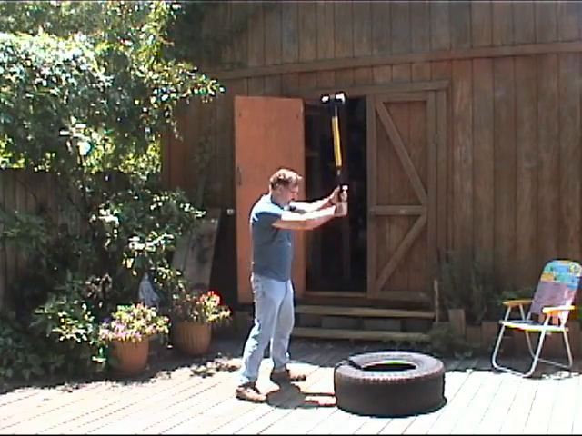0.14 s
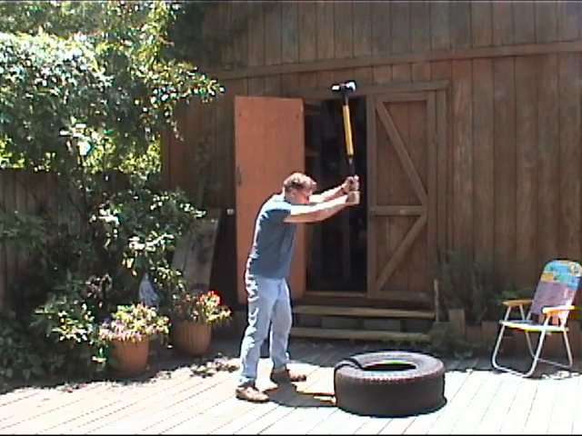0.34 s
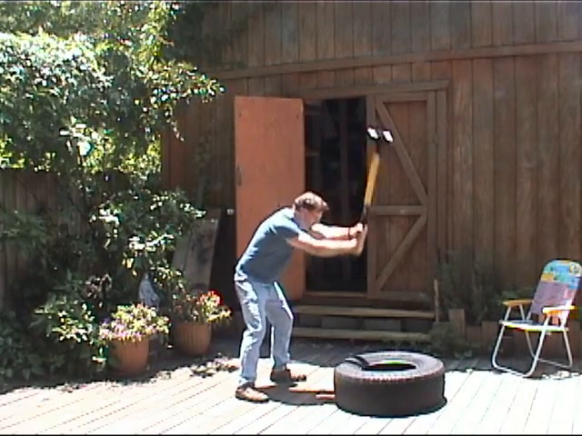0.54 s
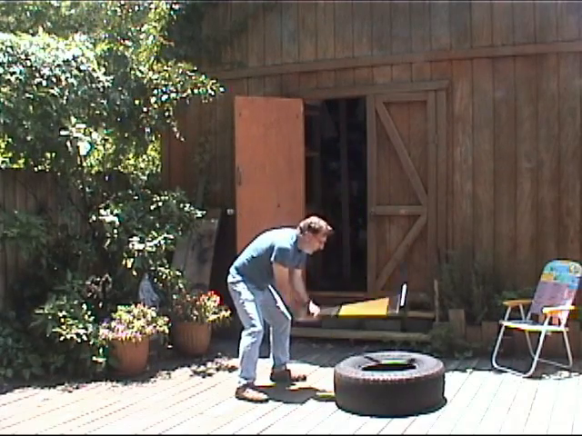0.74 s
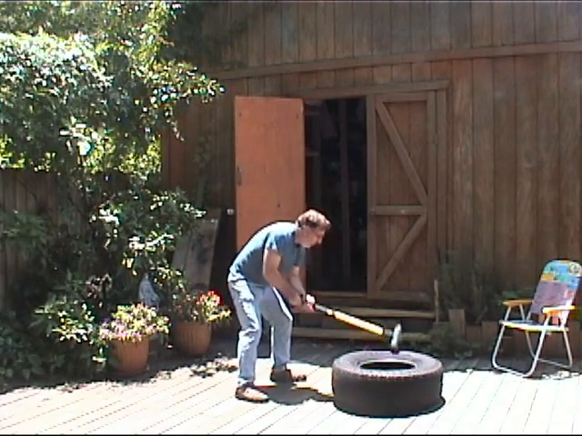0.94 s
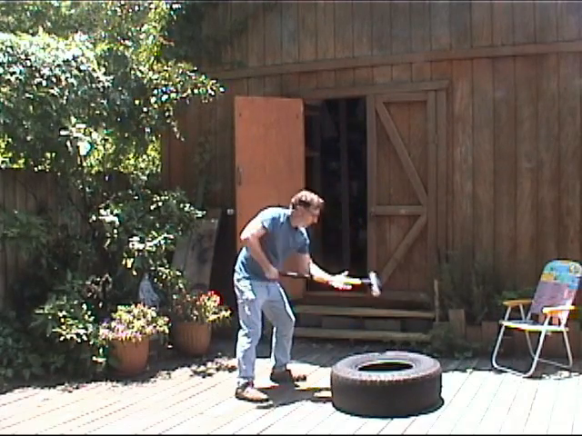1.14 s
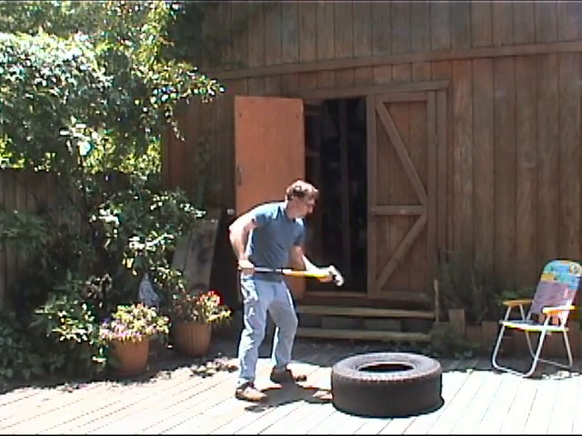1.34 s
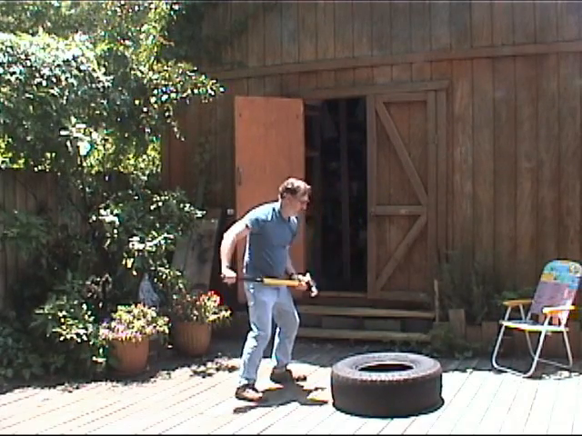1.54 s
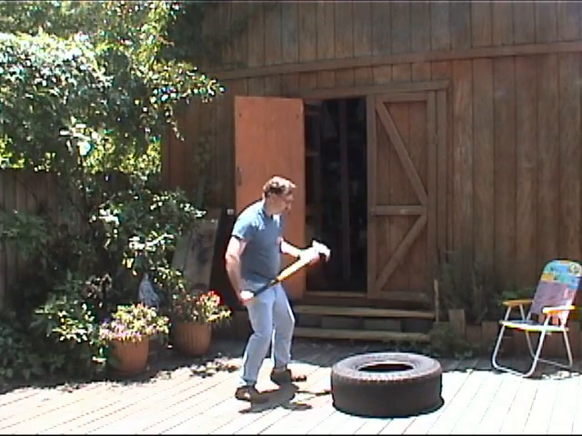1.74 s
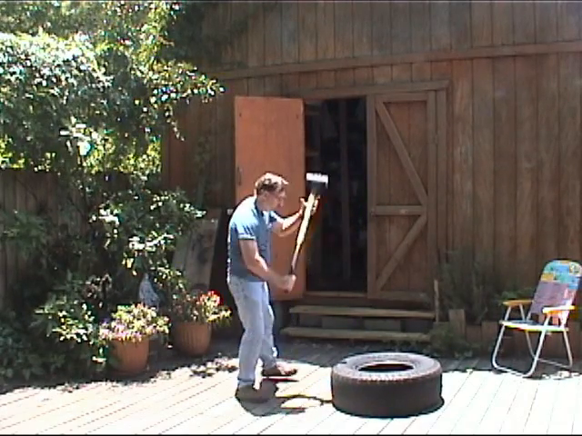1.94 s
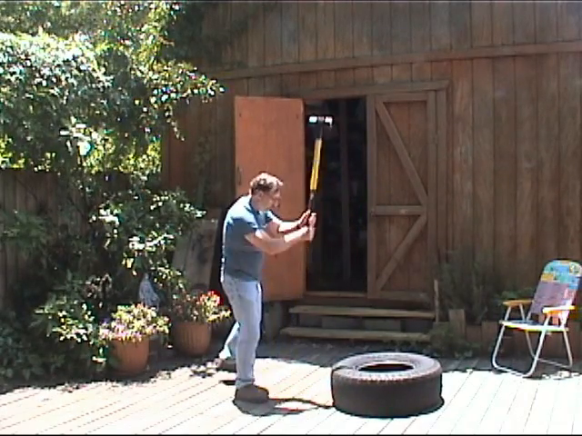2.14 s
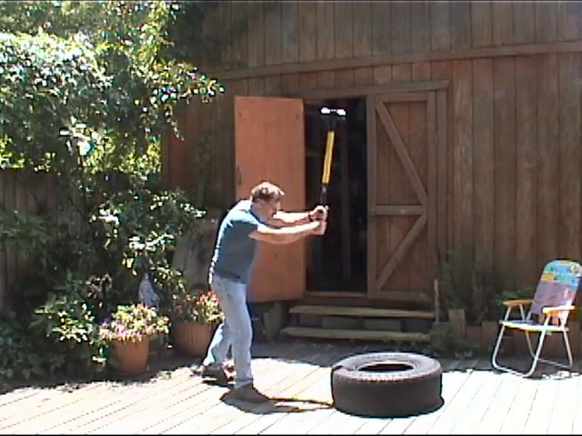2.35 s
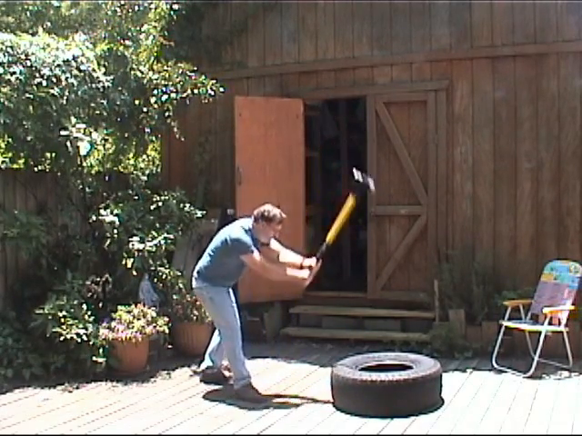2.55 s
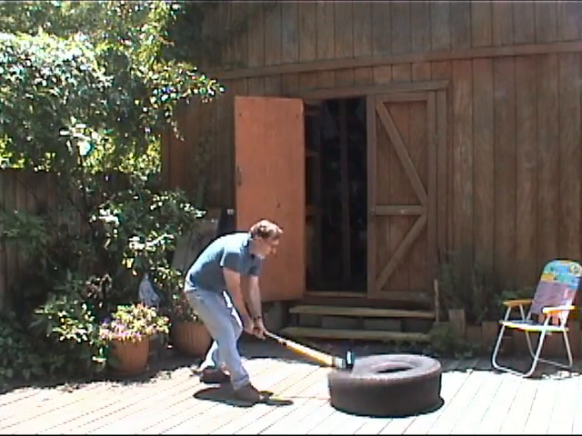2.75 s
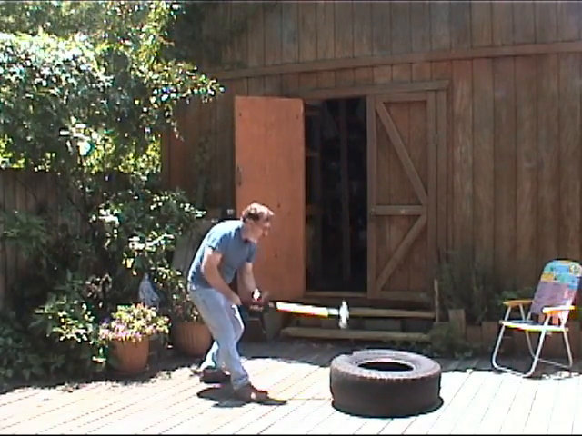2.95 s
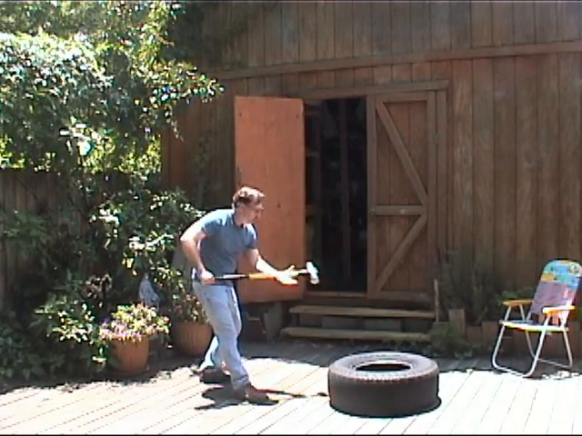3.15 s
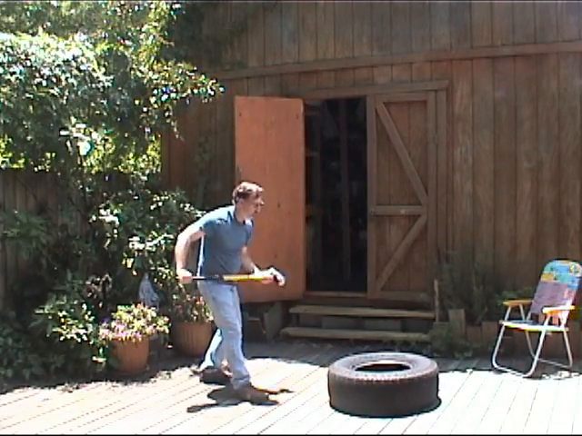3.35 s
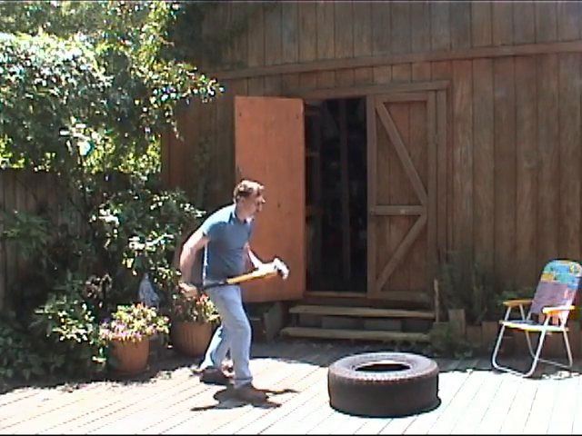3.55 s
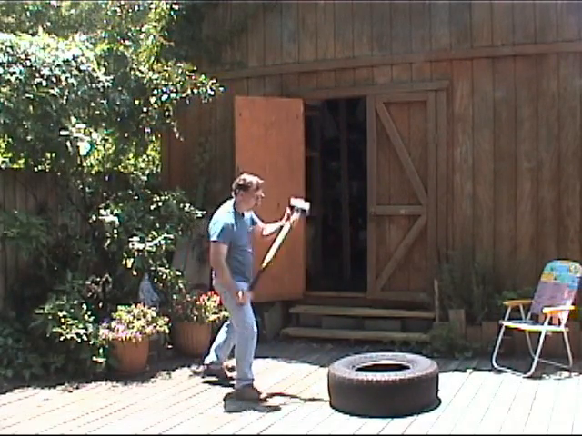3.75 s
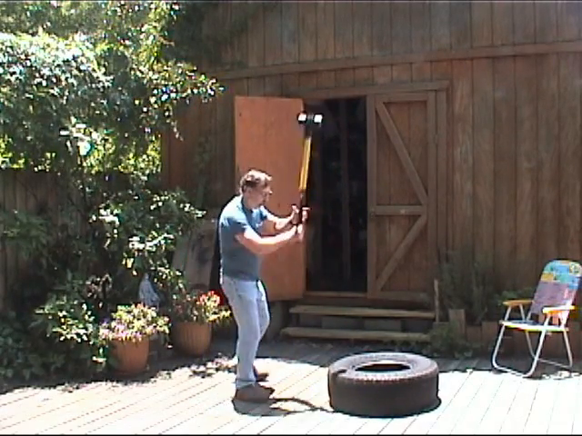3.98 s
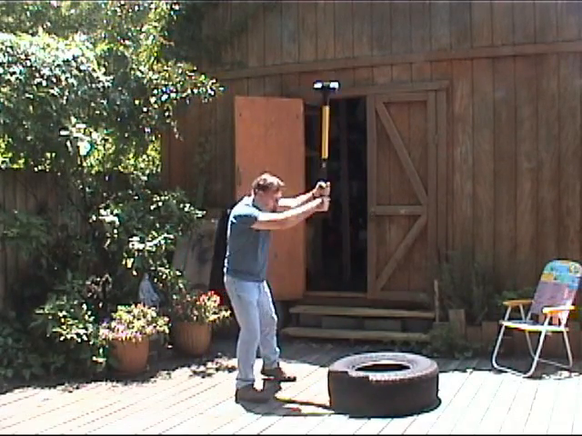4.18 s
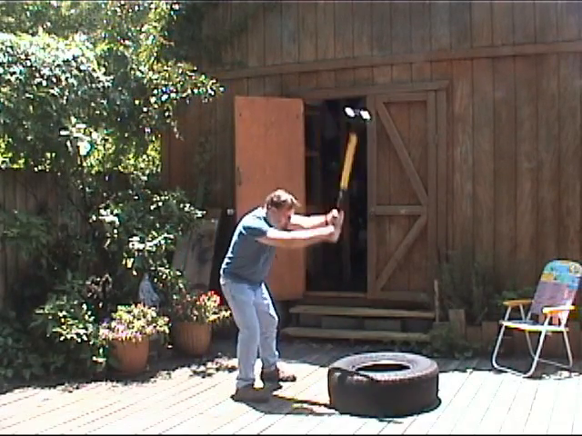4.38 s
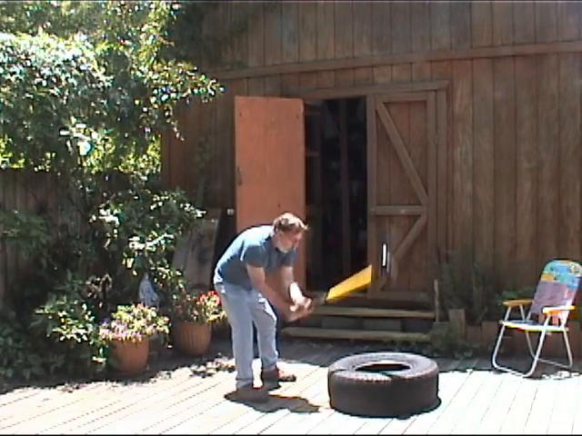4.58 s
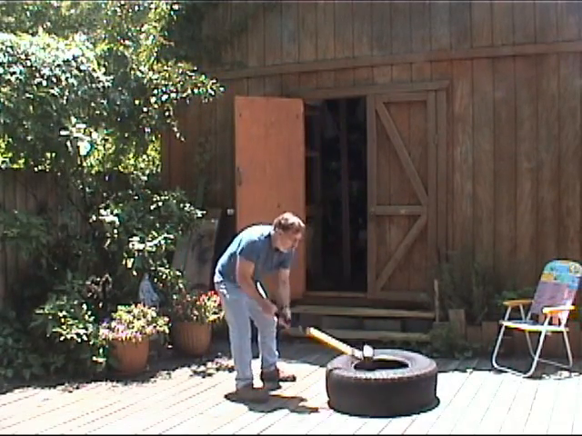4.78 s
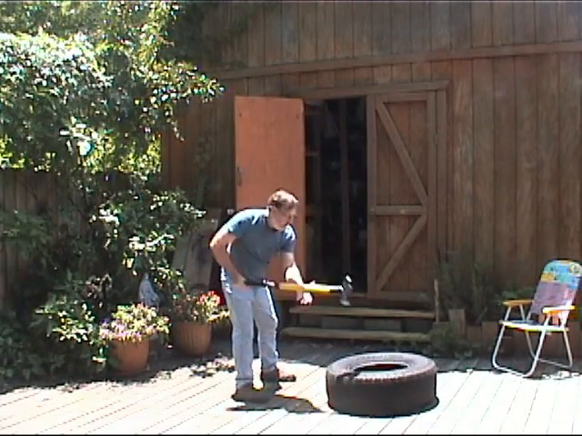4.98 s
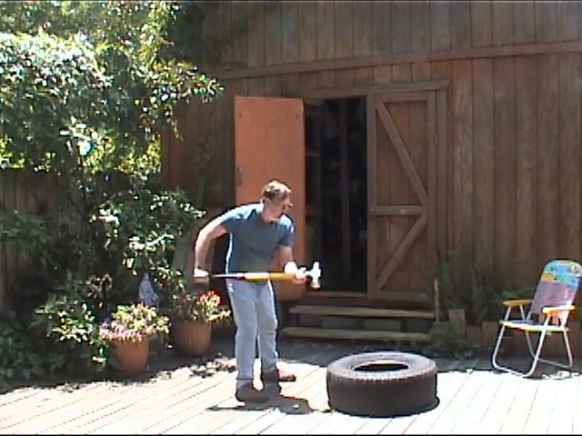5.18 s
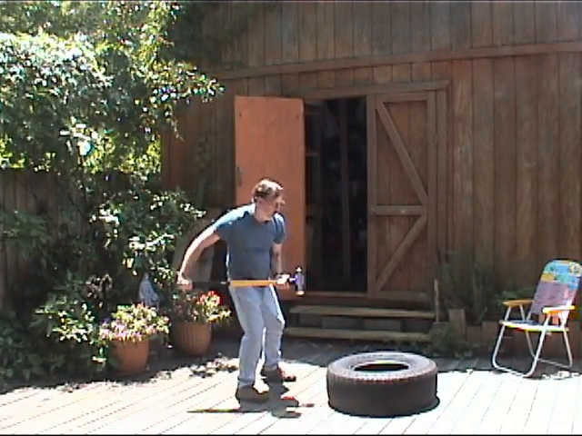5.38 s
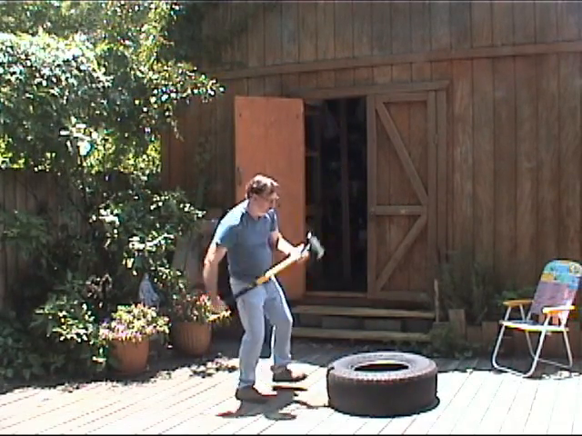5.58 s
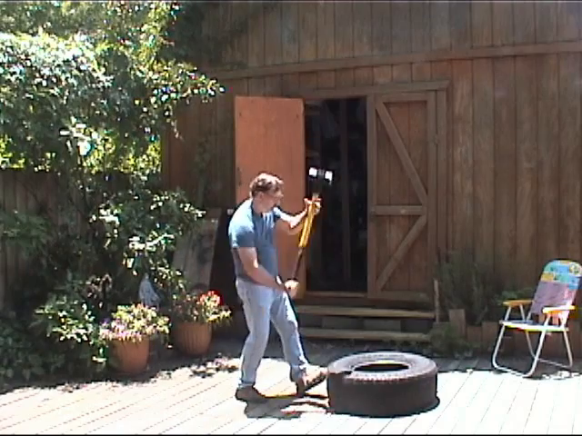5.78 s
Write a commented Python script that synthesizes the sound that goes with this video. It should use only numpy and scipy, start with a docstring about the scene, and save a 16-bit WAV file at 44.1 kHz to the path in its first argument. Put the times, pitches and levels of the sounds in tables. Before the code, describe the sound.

In a yard beside a wooden shed, a steady soft hush carries a faint low hum and thin motor whine. A hand brushes briefly along a shaft at the start, and shoes tap lightly. At 0.9 s a sledgehammer slaps a big rubber tyre against planks: a loud, blunt, woody thud with a short hollow hum of trapped air, then softer tumbling knocks until about 1.2 s. A very faint rising bird whistle comes at 1.4 s. Another faint slide and several shoe scuffs lead to the second blow at 2.8 s, brighter and grittier, with quick clacks just after and a smaller one at 3.1 s. A second tiny whistle follows near 3.4 s, then footfalls around 4.1 s. The third blow lands at 4.75 s, deeper and boomy, and the tyre knocks back down at 5.0 s. Short echoes fade and the quiet hush remains to about 6 s.

```python
"""The yard of a wooden shed: a sledgehammer pounds a big rubber tyre lying on a plank deck. Each blow slaps the
rubber and knocks the planks; the tyre shudders, its trapped air hums, and it jumps and lands again. A hand slides
on the shaft, shoes tap, a bird whistles far off, over a hush, a mains hum and a thin motor whine. Ringing is made
of decaying sines or filtered noise, hisses of shaped noise, whistle and hums of wavering sines."""
import sys
import numpy as np
from scipy import signal
from scipy.fft import rfft, irfft, next_fast_len
from scipy.io import wavfile
from scipy.ndimage import map_coordinates

SR = 44100
rng = np.random.default_rng(int(sys.argv[2]) if len(sys.argv) > 2 else 0)


def dump(signal):
    """Clip the signal to [-1, 1] and save it as 16-bit WAV at the path in sys.argv[1]."""
    limited = np.clip(np.atleast_2d(signal).T, -1, 1)
    pcm = np.round(limited * 32767).astype(np.int16)
    wavfile.write(sys.argv[1], SR, pcm)


N = 256662  # length in samples
# In all tables, t60_s is the time a sound takes to fall by 60 dB.


def amp(db):
    """Turn decibels into a plain multiplier."""
    return 10 ** (np.asarray(db) / 20)


def unit(x):
    """Scale a sound to an rms (average strength) of 1."""
    return x / np.sqrt(np.mean(x ** 2) + 1e-20)


def along(points, hz):
    """Read a curve of (pitch_hz, value) points, spaced by pitch ratio as the ear hears it."""
    point_hz, value = np.transpose(points)
    return np.interp(np.log(hz + 1), np.log(point_hz + 1), value)


def wobble(rate):
    """A smooth random curve through this many random points a second."""
    points = rng.standard_normal(int(N * rate / SR) + 4)
    return map_coordinates(points, [np.arange(N) * rate / SR])


def filtered(x, response):
    """Change the strength and phase of each frequency in x."""
    size = next_fast_len(N + SR // 2)
    hz = np.fft.rfftfreq(size, 1 / SR)
    return irfft(rfft(x, size) * response(hz), size)[..., :N]


def resonant(modes, widen):
    """A filter that rings at each mode; widen multiplies the damping, so shortens the ringing."""
    def response(f):
        total = 0
        for k, (hz, db, t60) in enumerate(modes):
            width = widen * np.log(1000) / (np.pi * t60)
            total = total + (-1) ** k * amp(db) * 1j * f * width / (hz * hz - f * f + 1j * f * width)
        return total
    return response


def pair(alike, colour):
    """Stereo noise of rms 1, with a left-right likeness and a gain for each frequency."""
    def mid_and_side(hz):
        turn = np.arccos(np.clip(along(alike, hz), -1, 1)) / 2
        return colour(hz) * np.array([np.cos(turn), np.sin(turn)])
    mid, side = filtered(rng.standard_normal((2, N)), mid_and_side)
    return unit(np.array([mid + side, mid - side]))


def leaning(x, lean):
    """Make left and right differ in level, by frequency."""
    return filtered(x, lambda hz: amp(np.outer([.5, -.5], along(lean, hz))))


# colour of the yard's hush: pitch_hz, level_db (per Hz)
HUSH_COLOUR = [(7.1, -66), (12, -21), (54, 2.5), (90, -6), (102, -20), (122, -8.5), (142, -5.5), (236, -6),
               (259, -8.5), (301, -8), (394, -10), (601, -9.5), (2550, -16.5), (13000, -32.5), (16000, -65)]
# how alike left and right are in the hush: pitch_hz, likeness (1 = same, 0 = unrelated, below 0 = opposed)
HUSH_ALIKE = [(60, 0.3), (130, 0.92), (290, 0.8), (640, 0.76), (1410, 0.64), (3100, 0.27), (6820, -0.017),
              (15000, -0.75)]
# steady hum and motor tones: pitch_hz, level_db (before a shared lift), waver_hz
STEADY_TONES = [(118, -54, 2.55), (1285, -64, 2.7), (1653, -60.5, 2.04), (8800, -76.5, 13.2),
                (13334, -73.5, 20)]
# narrow band of motor noise: pitch_hz, level_db, t60_s (before widening)
MOTOR_BAND = [(2632, 0, 0.019)]
# balance of the yard: pitch_hz, left_minus_right_db
YARD_BALANCE = [(60, -5), (240, -4.0), (950, -0.5), (3770, -1.5), (15000, -1.5)]
HUSH_DB = -43.5


def yard():
    """Steady hush of shaped noise, with hum and motor tones that waver a little in pitch and level."""
    hush_level = amp(HUSH_DB + 0.48 * wobble(2.89) + 0.2 * wobble(33))
    hush = hush_level * pair(HUSH_ALIKE, lambda hz: amp(along(HUSH_COLOUR, hz)))
    tones = np.zeros(N)
    for hz, level, waver_hz in STEADY_TONES:
        tone_level = amp(level + 3.5 + 1.4 * wobble(8.1))
        cycles = np.cumsum(hz + waver_hz * wobble(15)) / SR
        tones += tone_level * np.sin(2 * np.pi * cycles)
    whirr = amp(-60.5 + 2.4 * wobble(5.4)) * pair([(2690, 0.99)], resonant(MOTOR_BAND, widen=1.05))
    return leaning(hush + tones + whirr, YARD_BALANCE)


# a hand sliding along the shaft: peak_s, level_db
HAND_SLIDES = [(0.065, -44), (2.185, -44.5)]
# colour of palm on shaft: pitch_hz, level_db (per Hz)
PALM_COLOUR = [(1470, -36), (2500, -26), (2780, -2), (4140, -6), (4500, -5), (10600, -6), (15500, -8)]
SLIDE_RISE_DB_PER_S, SLIDE_FALL_DB_PER_S = 450, 222


def slide():
    """Skin rubs along the shaft as the hammer is raised: shaped noise that swells and fades."""
    t = np.arange(N) / SR
    gain = np.zeros(N)
    for peak_s, db in HAND_SLIDES:
        drop_db = np.maximum(SLIDE_RISE_DB_PER_S * (peak_s - t), SLIDE_FALL_DB_PER_S * (t - peak_s))
        gain += amp(db - drop_db)
    return gain * amp(1.1 * wobble(86)) * pair([(5000, 0.69)], lambda hz: amp(along(PALM_COLOUR, hz)))


# colour of the rubber slap: pitch_hz, level_db (per Hz)
SLAP_HISS = [(1200, 7), (2600, -1), (4000, 1.5), (6000, -1.5), (8500, -10)]
# colour of grit thrown up: pitch_hz, level_db (per Hz)
GRIT_FIZZ = [(5000, 17), (7500, 5.5), (11000, 5), (14000, -10), (16000, -30.5)]


def bright(spectrum):
    """Treble noise, largely different left and right, with a second of silence added at the end."""
    noise = pair([(3000, 0.23), (8000, 0.18), (12000, 0.28)], lambda hz: amp(along(spectrum, hz)))
    return np.pad(noise, ((0, 0), (0, SR)))


# shoes and grit on the planks: start_s, level_db, fizz_db (relative to the tap), pitch_hz, spread_octaves
SHOE_TAPS = [(0.444, -43, -21, 3000, 1.1), (.845, -36, -17, 1000, 0.97), (1.808, -48, -12, 4200, 0.29),
             (2.355, -33.5, -7, 980, 1.8), (2.363, -38, -12, 1200, 0.56), (2.447, -29.5, -22, 1030, 1.5),
             (2.456, -37, -24, 880, 1.2), (2.602, -44.5, -0.5, 5060, 1.1), (2.683, -51, 6, 4000, .9),
             (2.692, -50, 9, 4000, .9), (2.793, -52, 10, 4000, 0.87), (3.309, -45, -2, 5020, 1.1),
             (3.715, -49, 4, 3500, .9), (3.851, -45, -2, 3480, 0.57), (4.1057, -30.5, -3, 3250, 0.26),
             (4.219, -29.5, -14, 940, 1.3)]
TAP_CYCLES, TAP_T60_S = 30, .025  # a puff's t60 is this fixed part plus so many cycles of its pitch
TAP_FIZZ_T60_S = .02


def taps():
    """Shoes scuff lightly: a puff of noise around one pitch and a gritty fizz."""
    out, t, fizz = np.zeros((2, N + SR)), np.arange(SR // 5) / SR, bright(GRIT_FIZZ)
    grid_hz = np.fft.rfftfreq(len(t), 1 / SR) + 1
    onset = 1 - np.exp(-t / .001)
    for s, db, fizz_db, hz, octaves in SHOE_TAPS:
        first = round(s * SR)
        at = slice(first, first + len(t))
        colour = amp(-10 * (np.log2(grid_hz / hz) / octaves) ** 2)
        puff = unit(irfft(rfft(rng.standard_normal(len(t))) * colour, len(t)))
        fading_puff = onset * amp(-60 * t / (TAP_T60_S + TAP_CYCLES / hz)) * puff
        fading_fizz = amp(fizz_db - 60 * t / TAP_FIZZ_T60_S) * fizz[:, at]
        out[:, at] += amp(db) * (fading_puff + fading_fizz)
    return out[:, :N]


def ring(modes, t, centre_hz, octaves):
    """One contact: modes near its brightest pitch ring most, each at a new random strength; peak 1."""
    hz, db, t60 = np.transpose(modes)[:, :, None]
    near_db = -15 * np.log10(1 + (np.log2(hz / centre_hz) / octaves) ** 2)  # a peak with wide skirts
    scatter_db = 3 * rng.standard_normal(hz.shape)
    strength = amp(db + near_db + scatter_db - 60 * t / t60)
    x = np.sum(strength * np.sin(2 * np.pi * hz * t), axis=0)
    return x / np.abs(x).max()


# the tyre's walls: pitch_hz, level_db, t60_s (before any widening)
TYRE_WALLS = [(96.5, -4.5, 0.11), (114, -1, 0.093), (160.3, -3, 0.084), (183.3, -4, 0.16),
              (249.4, -6, 0.12), (298.7, -5.5, 0.099), (331, -8.5, 0.088)]
# the plank deck: pitch_hz, level_db, t60_s (before any added damping)
DECK_PLANKS = [(440.7, -5, 0.046), (530.5, 0.5, 0.074), (579, -1.5, 0.073), (657.5, -3, 0.17),
               (706, -0.5, 0.048), (815, -2, 0.034), (871.4, 1.5, 0.054), (962, 0.5, 0.056),
               (1026, -1, 0.061), (1150, -8, 0.024), (1250, -2, 0.086), (1496, -6.5, 0.035),
               (1680, -7, 0.031), (1947, -12, 0.022), (2350, -11.5, 0.034), (2810, -21.5, 0.0065),
               (3720, -27, 0.025), (4170, -29, 0.059)]
CONTACT_DELAY_S = .001  # every contact starts this long after its listed time


def contacts(table, octaves, t60_ms):
    """Each contact knocks the planks, thumps the tyre's walls and slaps the rubber."""
    out, t = np.zeros((2, N + SR)), np.arange(SR // 4) / SR
    hiss, fizz = bright(SLAP_HISS), bright(GRIT_FIZZ)
    # rubber pressed on the planks damps them
    press = amp(-60 * 1000 * t / max(t60_ms, 5))
    for s, db, hz, crack_db, fizz_db, thud_db, thud_hz, rise_ms in table:
        first = round((s + CONTACT_DELAY_S) * SR)
        at = slice(first, first + len(t))
        # a rolling landing swells, a flat slap starts sharply
        shape = (1 - np.exp(-1000 * t / max(rise_ms, .05))) ** 2 * press
        knock = ring(DECK_PLANKS, t, hz, octaves) * shape / shape.max()
        thud = amp(thud_db - 5.5) * ring(TYRE_WALLS, t, thud_hz, octaves=0.22)
        crack = amp(-9.5 - 60 * t / 0.013) * (amp(crack_db) * hiss[:, at] + amp(fizz_db) * fizz[:, at])
        # the first instant of contact
        snap = amp(crack_db + 7.0) * np.sin(2 * np.pi * 2600 * t) * amp(-60 * t / 0.0019)
        softness = 1 + (rise_ms / 1.5) ** 2  # a soft contact cracks less
        out[:, at] += amp(db + 1.0) * (knock + thud + (crack + snap) / softness)
    return out[:, :N]


# the tyre shudders after blows and landings: start_s, rise_s, hold_s, rattle_db, boom_db, hiss_db, fizz_db,
# hum_db, hum_hold_s, hum_hz (rises are time constants; holds are scaled for each part)
TYRE_SHUDDERS = [(0.881, 0.00087, 0.048, -19, -20, -44, -39, -17, 0.047, 266),
                 (1.014, .004, 0.035, -46, -30, -65, -51, -31, .03, 275.9),
                 (1.054, 0.01, 0.015, -34.5, -46, -63, -55, -47, .02, 278.7),
                 (1.139, 0.0056, 0.025, -28, -29, -53, -49, -46, .01, 274),
                 (2.828, 0.001, 0.073, -21.5, -23.5, -23, -23.5, -18, .045, 274),
                 (3.115, 0.0028, 0.0092, -24.5, -34, -46, -62, -35.5, .05, 277.6),
                 (4.757, 0.0011, 0.042, -22, -14.5, -22, -29, -23.5, 0.098, 263.2),
                 (5.024, 0.0024, .015, -24.5, -35.5, -44.5, -64, -35, .01, 281)]
# how each part dies: (share of the hold before it falls, t60_s)
RATTLE_DIES, BOOM_DIES, HISS_DIES = (1.03, 0.21), (0.41, .27), (0.37, 0.26)
FIZZ_DIES, HUM_DIES = (0.087, 0.21), (0.97, 0.21)
TAIL_DB, TAIL_SLOWER = -24.5, 5.1  # a weaker tail under each decay, so many times slower


def dying(column, dies, rise_s=0, hold=2):
    """Gain of one part of the shudder: rise, hold, then a fast decay over a slower tail."""
    power = np.zeros(N)
    for row in TYRE_SHUDDERS:
        t = np.maximum(np.arange(N) / SR - row[0], 0)
        after = np.maximum(t - dies[0] * row[hold], 0) / dies[1]
        fall = amp(-60 * after) + amp(TAIL_DB - 60 * after / TAIL_SLOWER)
        rise = 1 - np.exp(-t / max(row[1], rise_s, 1e-4))
        power += amp(2 * row[column]) * (rise * fall) ** 2
    return np.sqrt(power)


CHATTER_DB, CHATTER_SPREAD_DB = 7, 3.5  # level over the rattle, random scatter either way
CHATTER_LASTS, CHATTER_FROM_S = 1.4, .04  # length in holds; only a longer hold than this chatters
CHATTER_HZ, CHATTER_OCTAVES = 610, 0.53  # middle pitch, random scatter either way
CHATTER_CRACK_DB, CHATTER_THUD_DB = -7, -9


def chatter(count):
    """Rows of small random slaps for contacts(), while the tyre is held down under the hammer."""
    rows = []
    for s, _, hold_s, rattle_db, _, hiss_db, fizz_db, *_, hum_hz in TYRE_SHUDDERS:
        slaps = count * (hold_s > CHATTER_FROM_S)
        for when, size, pitch, low in rng.random((slaps, 4)):
            start_s = s + when * CHATTER_LASTS * hold_s
            level_db = rattle_db + CHATTER_DB + CHATTER_SPREAD_DB * (2 * size - 1)
            pitch_hz = CHATTER_HZ * 2 ** (CHATTER_OCTAVES * (2 * pitch - 1))
            crack_db = CHATTER_CRACK_DB + (hiss_db - rattle_db) / 2
            thud_hz = hum_hz * (1 - low / 2)
            rows.append((start_s, level_db, pitch_hz, crack_db, fizz_db - rattle_db, CHATTER_THUD_DB, thud_hz))
    return rows


# blows and the loudest slaps after them: start_s, level_db (knock, before a shared lift), pitch_hz (knock),
# crack_db, fizz_db, thud_db (these three relative to the knock, before shared shifts), thud_hz
HAMMER_BLOWS = [(0.88, -1, 535, -14.5, -39, -17, 307), (0.894, -6, 799, -32, -37, -2.5, 111),
                (0.904, -4.5, 832, -32, -38, -10, 269), (0.9187, 0, 990, -11.5, -33, -9, 210),
                (0.925, -2, 930, -21, -39, -27, 293), (1.016, -22.5, 834, -33, -11, 5.5, 105),
                (2.828, -3, 520, -10, 10.5, -4.5, 328), (2.833, -12, 401, -11, 1, 2.5, 310),
                (2.848, 0, 587, -14, -25, -6, 328), (2.855, -5, 401, -13, -19, -5, 285),
                (2.901, -10.5, 910, -51, -38, -1, 276), (4.7564, 0, 410, -10.5, -27, -3, 152),
                (4.761, -6.5, 1060, -4.5, -4, -0.5, 106), (4.771, -5.5, 429, -9, -16, -7, 90),
                (4.776, -7.5, 510, -18, -29, -4, 147), (4.788, -5.5, 401, -25, -24, -5, 180),
                (4.793, -1, 710, -24, -32, -12, 234)]
BLOW_RISE_MS, BLOW_T60_MS = .6, 68  # rise time constant, damping of the planks


def blows():
    """The hammer slaps the tyre against the planks, and small random slaps follow."""
    rows = [row + (BLOW_RISE_MS,) for row in HAMMER_BLOWS + chatter(count=7)]
    return contacts(rows, octaves=0.24, t60_ms=BLOW_T60_MS)


def shudder():
    """The deformed tyre chatters on the planks: grainy noise makes them and the tyre's walls ring."""
    grainy_level = amp(1.74 * wobble(400))
    rattle = unit(grainy_level * pair([(400, 1.0), (3000, 0.69)], resonant(DECK_PLANKS, widen=2.73)))
    boom = pair([(60, 0.71), (120, 0.99)], resonant(TYRE_WALLS, widen=1.96))
    hiss = dying(column=5, dies=HISS_DIES) * bright(SLAP_HISS)[:, :N]
    fizz = dying(column=6, dies=FIZZ_DIES) * bright(GRIT_FIZZ)[:, :N]
    low = dying(column=3, dies=RATTLE_DIES) * rattle + dying(column=4, dies=BOOM_DIES) * boom
    return low + amp(2.5 * wobble(400)) * (hiss + fizz)


HUM_RISE_S, HUM_CLIMB_HZ_PER_S, HUM_FLEX_DB = 0.029, 50, 5


def cavity():
    """The ring of air in the tyre hums, climbing as the walls relax and uneven as they flex."""
    t, columns = np.arange(N) / SR, np.transpose(TYRE_SHUDDERS)
    start_s, start_hz = columns[0], columns[-1]
    last = np.maximum(np.searchsorted(start_s, t) - 1, 0)  # the latest shudder at each moment
    hz = start_hz[last] + HUM_CLIMB_HZ_PER_S * np.clip(t - start_s[last], 0, .3)
    swell = dying(column=7, dies=HUM_DIES, rise_s=HUM_RISE_S, hold=8)
    level = swell * amp(HUM_FLEX_DB * wobble(35))
    return level * np.sin(2 * np.pi * np.cumsum(hz) / SR)


# how long the echo lasts: pitch_hz, t60_s
SHED_ECHO = [(100, 0.26), (1000, 0.42), (4000, 0.55), (12000, 0.25)]


def shed(x):
    """The shed wall and fences answer with fading noise; each frequency dies at its own speed."""
    hz, t, noise = signal.stft(rng.standard_normal((2, SR // 2)), SR, nperseg=256)
    fading = noise * amp(-60 * t / along(SHED_ECHO, hz)[:, None])
    tail = signal.istft(fading, SR, nperseg=256)[1]
    tail = tail + 2.6 * tail[::-1]  # left and right share much of the same echo
    delayed = np.pad(x, (300, 0))[None]  # 300 samples later
    return signal.fftconvolve(delayed, tail / np.linalg.norm(tail[0]), axes=1)[:, :N]


# the tyre's edge rolling back onto the planks: start_s, level_db (knock, before a shared lift),
# pitch_hz (knock), thud_db (relative to the knock, before a shared shift), rise_ms (time constant)
TYRE_LANDINGS = [(0.993, -9, 700, -16, 2.8), (1.062, -9.5, 860, -22, 4.5), (1.078, -9.5, 800, -14, 2.2),
                 (1.146, -3.5, 756, -14.5, 4.4), (1.156, -0.5, 850, -33, 1.15),
                 (1.167, -10.5, 1170, -21, 3), (2.891, -4, 890, -12, 2.4), (2.915, 5.5, 876, -31, 1.25),
                 (2.936, -1, 870, -9.5, 3), (2.984, -17, 1000, -8, 2.5), (3.1204, -3, 950, -19, 0.83),
                 (3.134, -14, 1500, -6, 2), (5.023, -13, 944, -19, 4.6), (5.029, 4, 990, -20, 2.7),
                 (5.044, -17, 840, -25, 1.3), (5.07, -22, 797, -11, 3)]
LANDING_CRACK_DB, LANDING_FIZZ_DB = -34, -48  # relative to the knock, before shared shifts
LANDING_THUD_HZ, LANDING_T60_MS = 266, 46


def landings():
    """The tyre's edge rolls back onto the planks: softer contacts, each with its own swell."""
    rows = []
    for s, db, hz, thud_db, rise_ms in TYRE_LANDINGS:
        rows.append((s, db, hz, LANDING_CRACK_DB, LANDING_FIZZ_DB, thud_db, LANDING_THUD_HZ, rise_ms))
    return contacts(rows, octaves=.21, t60_ms=LANDING_T60_MS)


# far whistles: start_s, length_s, pitch_hz (at the start), level_db (at the end)
BIRD_WHISTLES = [(1.4, .26, 2455, -53.5), (3.36, .16, 2610, -56)]
BIRD_CLIMB_HZ_PER_S, BIRD_SWELL_DB_PER_S, BIRD_FADE_S = 2350, 14, .04


def bird():
    """A far whistle: a sine that climbs and swells, slightly unsteady in pitch and level."""
    out, waver = np.zeros(N), np.cumsum(8 * wobble(33.7)) / SR
    for s, length_s, hz, db in BIRD_WHISTLES:
        t = np.arange(N) / SR - s
        fade = np.minimum(t / BIRD_FADE_S + .5, (length_s - t) / BIRD_FADE_S + .5)
        gate = np.clip(fade, 0, 1) * (t > 0) * (t < length_s)
        level = amp(db + BIRD_SWELL_DB_PER_S * np.clip(t - length_s, -1, 0))
        cycles = hz * t + BIRD_CLIMB_HZ_PER_S * t * t / 2 + waver
        out += level * gate * np.sin(2 * np.pi * cycles)
    return out * amp(2.5 * wobble(30))


# balance of the tyre, taps and echo: pitch_hz, left_minus_right_db
TYRE_BALANCE = [(60, 0), (240, -3.5), (950, -1.5), (3770, -1), (15000, -0.5)]


def scene():
    """Mix everything; the shed echoes the blows, taps and landings."""
    struck = blows() + taps()
    landed = landings()
    echo = shed(np.mean(amp(-10) * struck + amp(-15) * landed, axis=0))
    tyre = leaning(struck + landed + echo + shudder() + cavity(), TYRE_BALANCE)
    return tyre + slide() + bird() + yard()


BASS_HZ, TREBLE_HZ = 71, 13400  # edges of the microphone's range
TOP_HZ = 16300  # nothing stays above this


def record(dry):
    """The microphone drops deep bass and top treble, peaks clip softly, then the very top is cut off."""
    no_bass = signal.butter(3, BASS_HZ, "high", fs=SR, output="sos")
    no_treble = signal.butter(4, TREBLE_HZ, fs=SR, output="sos")
    heard = signal.sosfilt(np.vstack([no_bass, no_treble]), dry)
    soft = heard / (1 + np.abs(heard / .98) ** 8) ** (1 / 8)
    return filtered(soft, lambda hz: hz < TOP_HZ)


dry = scene()
out = record(dry)
dump(out)
```